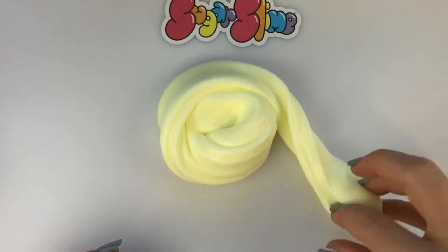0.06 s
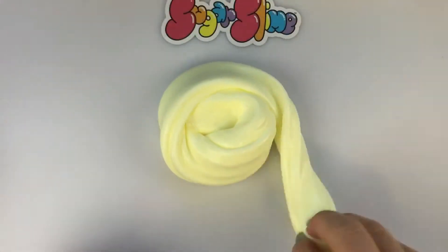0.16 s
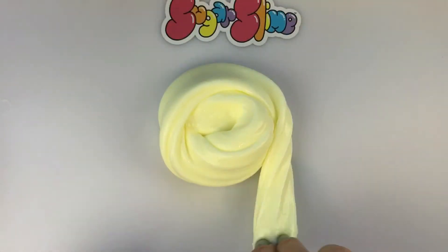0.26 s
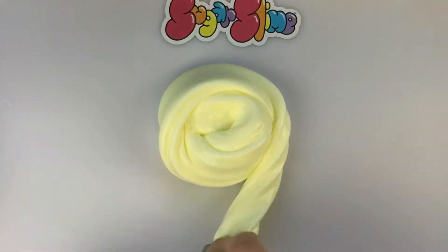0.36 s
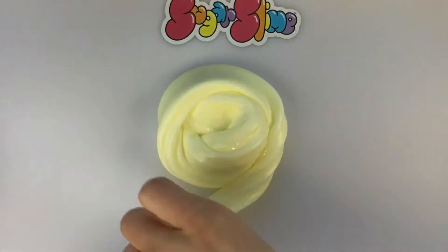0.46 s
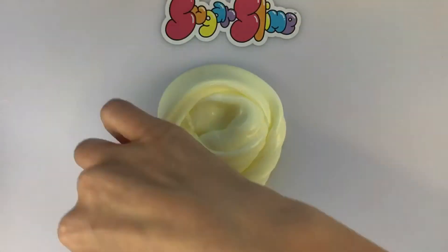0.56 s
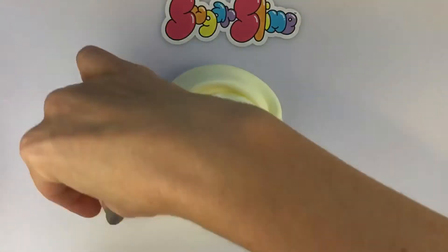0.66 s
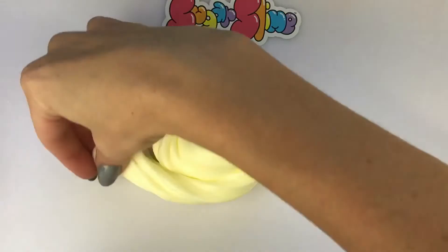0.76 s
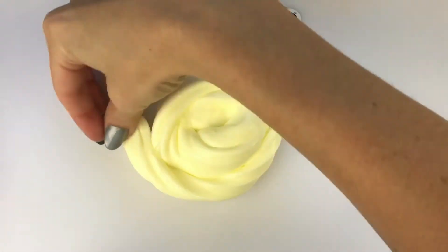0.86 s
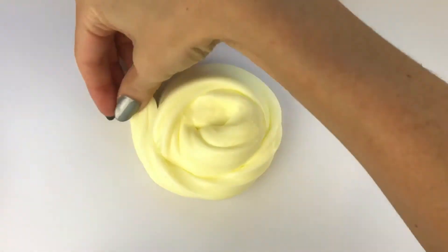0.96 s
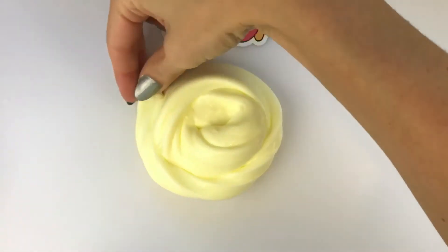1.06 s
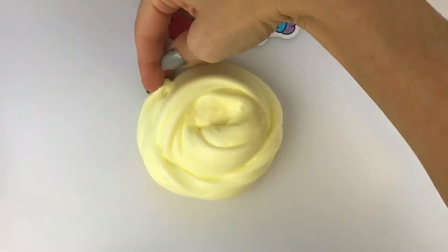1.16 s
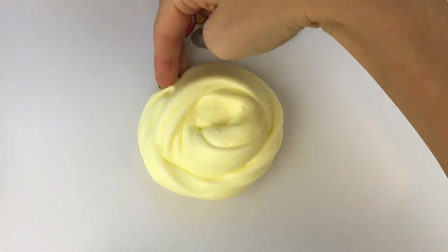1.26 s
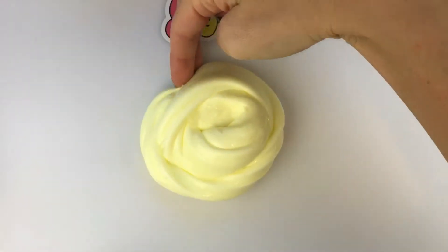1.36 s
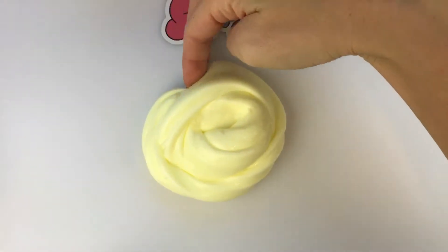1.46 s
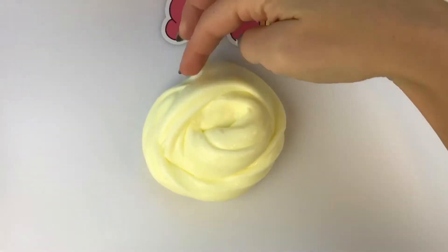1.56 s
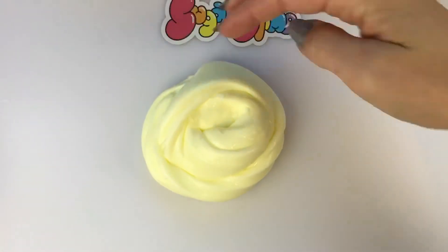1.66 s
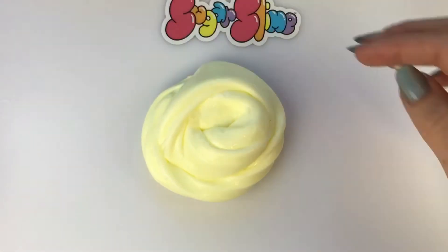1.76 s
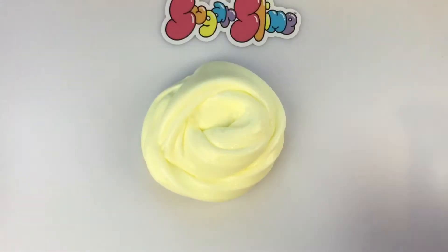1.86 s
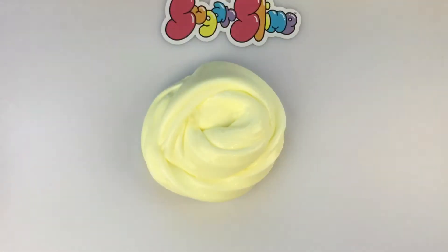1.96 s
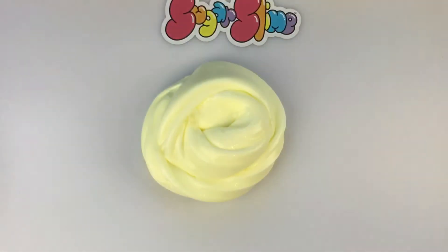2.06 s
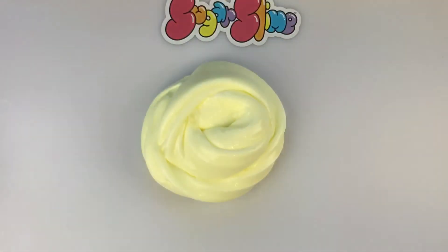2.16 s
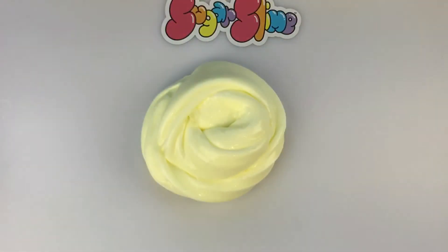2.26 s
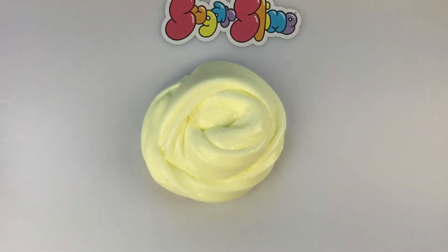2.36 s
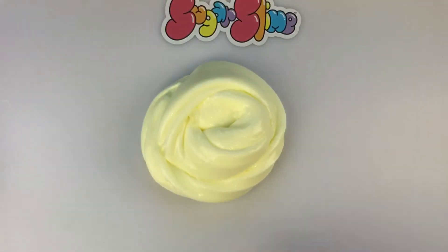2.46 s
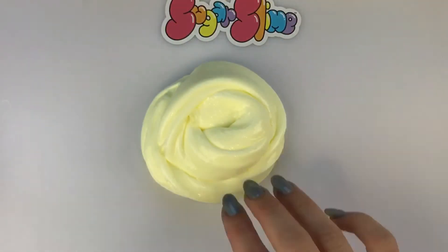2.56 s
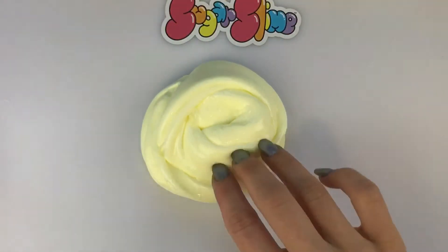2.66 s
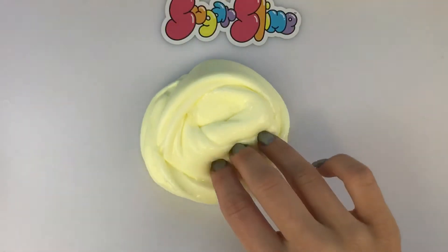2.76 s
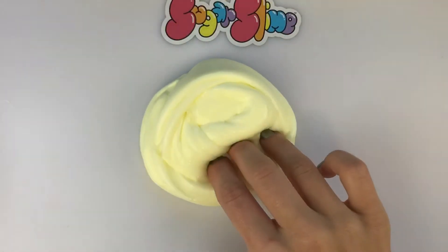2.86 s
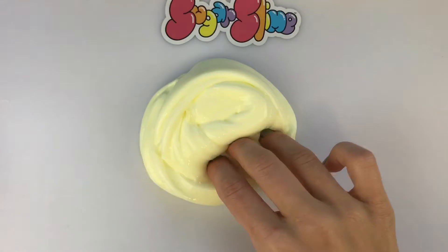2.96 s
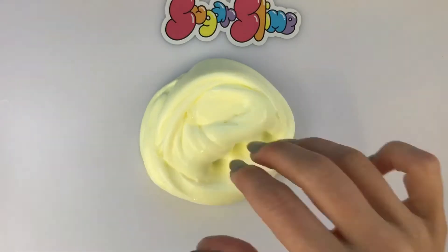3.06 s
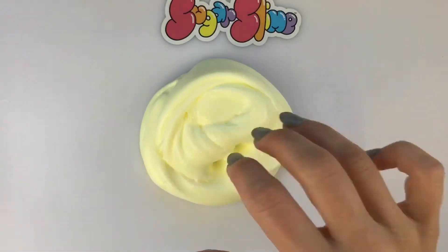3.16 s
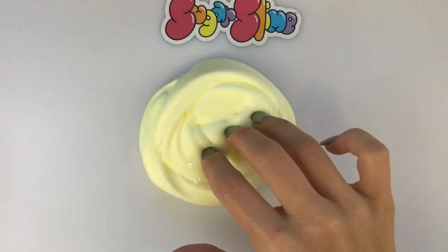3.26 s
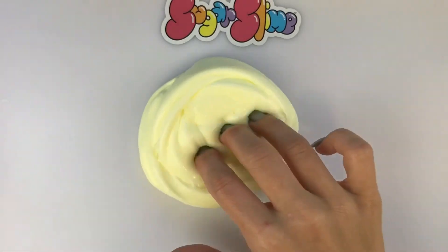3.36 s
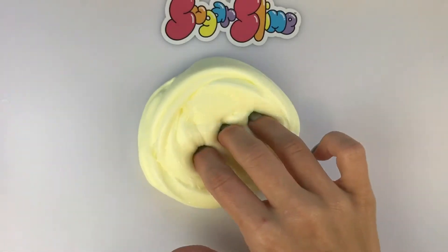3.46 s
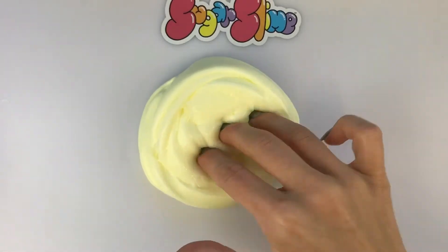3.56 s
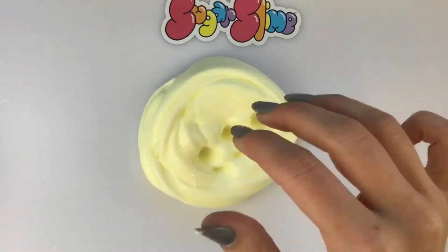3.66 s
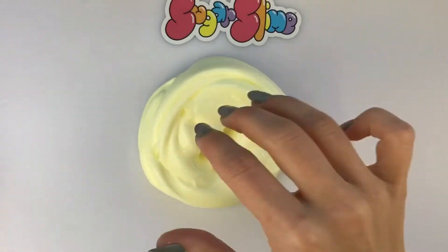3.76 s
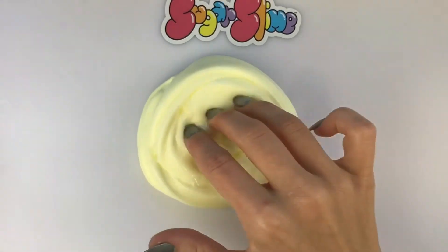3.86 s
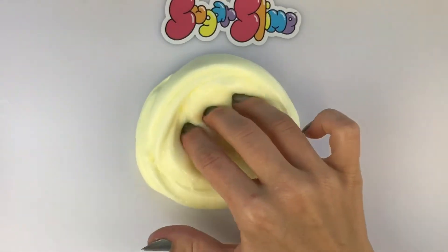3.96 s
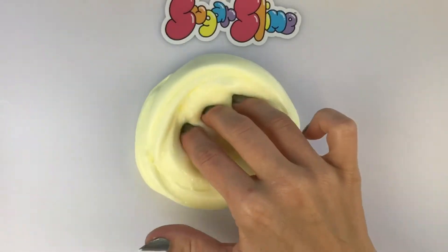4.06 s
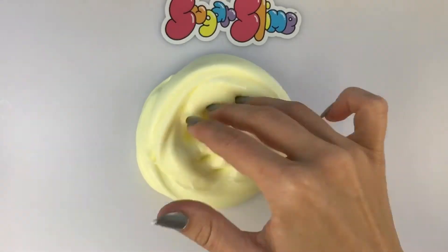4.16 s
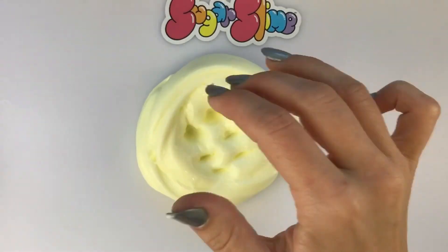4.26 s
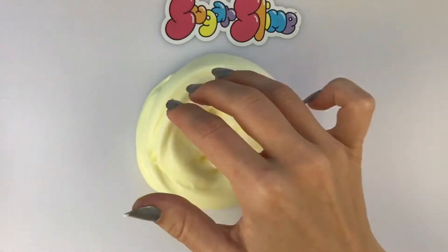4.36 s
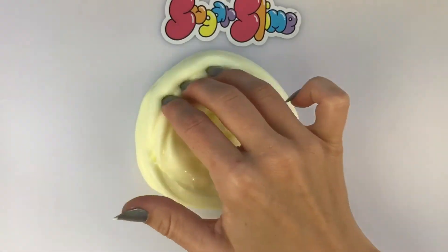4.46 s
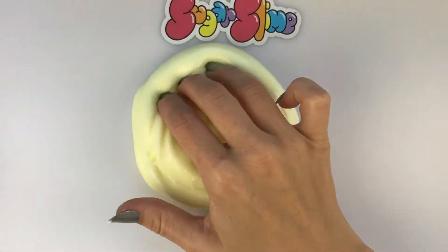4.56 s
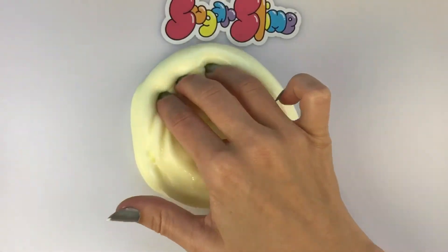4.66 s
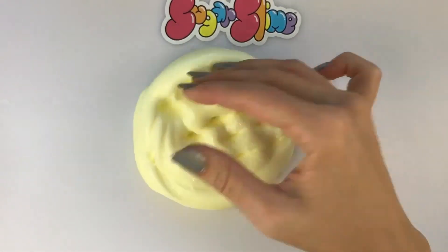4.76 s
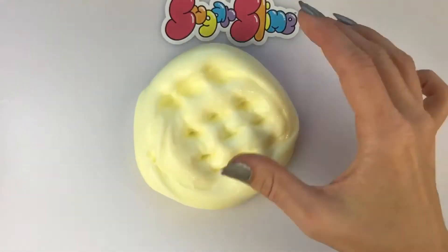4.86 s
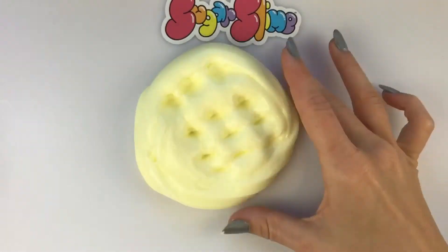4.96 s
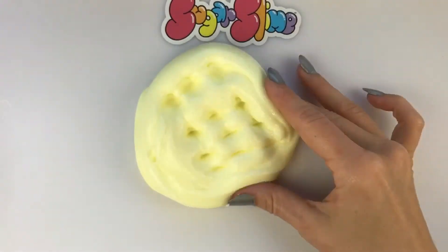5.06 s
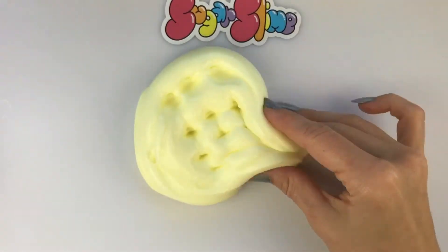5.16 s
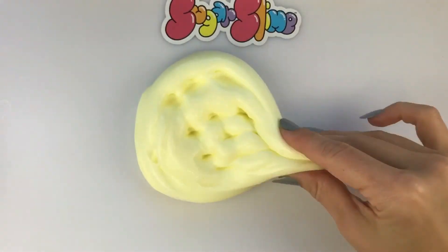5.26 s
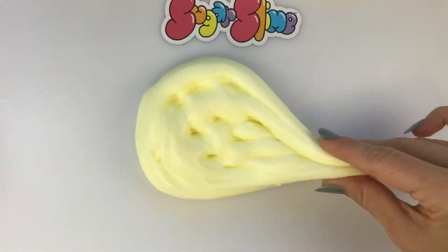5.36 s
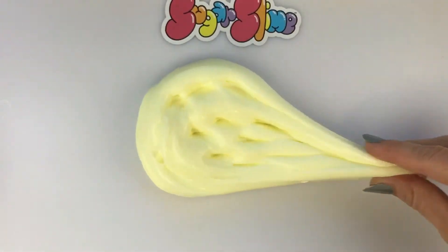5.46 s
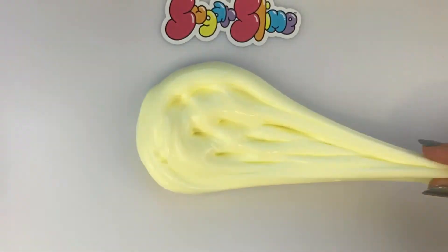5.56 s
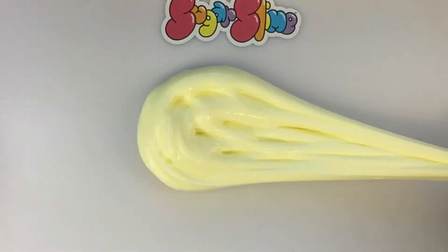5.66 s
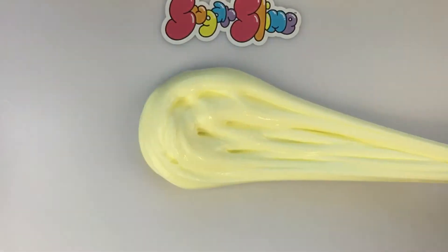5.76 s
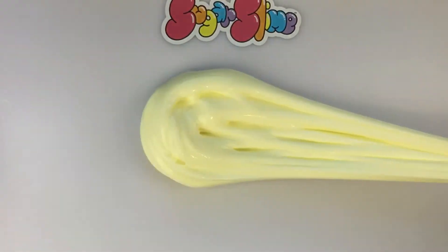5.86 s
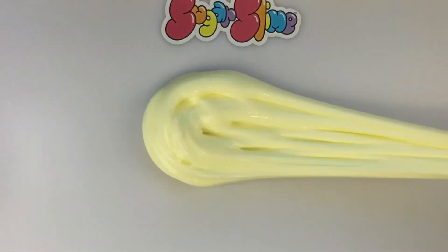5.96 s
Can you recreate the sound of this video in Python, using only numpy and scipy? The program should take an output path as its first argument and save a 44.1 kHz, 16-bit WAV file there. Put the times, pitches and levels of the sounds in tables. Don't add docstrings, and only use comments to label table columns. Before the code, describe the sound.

Close to a phone microphone in a quiet room, thick slime on a table is handled by fingers. Faint hush and light sticky ticks come first, with a few isolated clicks. Around three seconds, pokes begin, each giving a tight burst of sharp snaps, wet clicks, hollow gulps and small table thuds. The strongest bursts fall in the middle, then peeling crackle fades into a soft stretch.

```python
import sys
import numpy as np
from scipy import signal
from scipy.fft import rfft, irfft, next_fast_len
from scipy.io import wavfile
from scipy.ndimage import uniform_filter1d

SR = 44100
rng = np.random.default_rng(int(sys.argv[2]) if len(sys.argv) > 2 else 0)


def voltage_ratio(level):
    return 10 ** (np.asarray(level, float) / 20)


def wav_record(signal):
    frames = np.transpose(np.atleast_2d(signal))
    bounded = np.clip(frames, -1, 1)
    quanta = np.round(bounded * 32767).astype(np.int16)
    wavfile.write(sys.argv[1], SR, quanta)


N = 265041
REST_GAP_HZ = 5100


def along(points, hz):
    f, value = np.transpose(points)
    return np.interp(np.log(hz + 1), np.log(f + 1), value)


def unit(x):
    return x / np.sqrt(np.mean(x ** 2) + 1e-20)


def filtered(x, response):
    m = next_fast_len(N + 8192)
    return irfft(rfft(x, m) * response(np.fft.rfftfreq(m, 1 / SR)), m)[:N]


def laid(start_s, rows):
    at = np.round(start_s * SR).astype(int)[:, None] + np.arange(rows.shape[1])
    return np.bincount(np.clip(at, 0, N).ravel(), rows.ravel(), N + 1)[:N]


def swell(length_s, size, sharp):
    t = np.arange(size) / SR
    fall = length_s[:, None] / (1.4 + 1.4 * sharp)
    rise = sharp * fall
    return t, rise[:, 0], (t / rise) ** sharp * np.exp(sharp - t / fall)


def hush():
    # frequency in Hz, density in dB per Hz.
    hush_curve = [(15, -54), (25, -6.5), (47, 1), (108, 1), (232, -8), (368, -13), (457, -19.5),
                  (669, -16.5), (1510, -26), (2090, -27.5), (11600, -37.5), (15200, -32.5), (16500, -65)]
    # frequency in Hz, width in Hz, gain in dB.
    port_modes = [
        (6470, 710, 6.5),
        (11620, 450, 9.5),
    ]
    level_db, patchy_db = -63, 1.53
    z = signal.stft(rng.standard_normal(N), nperseg=512)[2]
    over_hz = uniform_filter1d(rng.standard_normal(z.shape), 8, 0)
    patches = uniform_filter1d(over_hz, 12, 1)
    noise = signal.istft(z * voltage_ratio(patchy_db * unit(patches)), nperseg=512)[1][:N]

    def colour(f):
        port = 1 + sum(voltage_ratio(db) / (1 + (2 * (f - hz) / w) ** 2) for hz, w, db in port_modes)
        return voltage_ratio(along(hush_curve, f)) * port

    return voltage_ratio(level_db) * unit(filtered(noise, colour))


def effort():
    # start in seconds, end in seconds, effort at the start in dB,
    # effort at the end in dB, gap pitch in Hz.
    stroke_list = [(0.203, 0.4, -80, -76.5, 4700), (0.588, 0.656, -71, -62.5, 2620),
                   (.8, .97, -82, -81, 4340), (.97, 1.116, -72.5, -81, 4260),
                   (1.413, 1.697, -76, -84, 5950), (3.117, 3.25, -74, -84, 4700),
                   (3.693, 3.744, -64, -64.5, 3450), (3.74, 4.044, -72, -70.5, 4250),
                   (4.252, 4.44, -69.5, -83.5, 4400), (4.612, 4.703, -72, -88, 5530),
                   (4.814, 4.932, -55, -77, 3900), (4.97, 5.06, -76, -77, 4100),
                   (5.057, 5.138, -73.5, -68.5, 6500), (5.129, 5.175, -66.5, -56, 5930),
                   (5.173, 5.204, -58, -61, 6500), (5.204, 5.229, -59.5, -64, 8000),
                   (5.228, 5.259, -64, -64, 5730), (5.263, 5.292, -59, -67, 3800),
                   (5.292, 5.334, -64, -63, 3700), (5.334, 5.38, -69, -61.5, 3400),
                   (5.376, 5.46, -75, -83, 4500), (5.46, 5.957, -80.5, -77.5, 5330),
                   (4.174, 4.195, -72, -70, 5900), (4.763, 4.78, -72, -69, 6000)]
    rest_db = -82.5
    t = np.arange(N) / SR
    over_db = np.zeros(N)
    gap_hz = np.full(N, float(REST_GAP_HZ))
    for start, end, first_db, last_db, hz in stroke_list:
        on = slice(round(start * SR), round(end * SR))
        over_db[on] = np.interp(t[on], [start, end], [first_db, last_db]) - rest_db
        gap_hz[on] = hz
    return uniform_filter1d(over_db, size=200), gap_hz


def peeling():
    # pitch in Hz, spread in octaves, rate in grains per second, length in cycles.
    grain_sizes = [
        (1142, 1.42, 2600, 2),
        (3900, 1.17, 4800, 1.57),
        (10000, 0.69, 5400, 0.98),
    ]
    # resting level in dB, gain in dB per dB of effort,
    # tilt in dB per octave of gap pitch.
    follow_rules = [
        (-81, 0.7378, 2),
        (-83.5, 0.9855, -0.3),
        (-86.5, 1.0556, 7.5),
    ]
    spiky_db = 1.8
    over_db, gap_hz = effort()
    gap_octaves = np.log2(gap_hz / REST_GAP_HZ)
    bunching = unit(uniform_filter1d(rng.standard_normal(N), 350))
    clumps = voltage_ratio(2.8 * np.clip(bunching, -2, 2))
    out = np.zeros(N)
    for k, (hz, octaves, rate, cycles) in enumerate(grain_sizes):
        count = int(min(rate * N / SR, 60000))
        when, pitch, luck = rng.random((3, count))
        when = when * N / SR
        centre = gap_hz[(when * SR).astype(int)] if k == 1 else hz
        f = centre * 2 ** (octaves * (2 * pitch - 1) ** 3)
        f = np.minimum(f, .36 * SR)[:, None]
        turns = np.arange(int(3 * cycles * SR / hz))[None] / SR * f
        rows = np.sin(2 * np.pi * turns) * turns * np.exp(-2.5 * turns / cycles)
        rows *= voltage_ratio(-spiky_db * np.log(luck[:, None] + 1e-3))
        grains = unit(laid(when, rows * np.sqrt(f / hz)) * np.roll(clumps, k * SR))
        rest_db, grows, tilt_db = follow_rules[k]
        out += voltage_ratio(rest_db + grows * over_db + tilt_db * gap_octaves) * grains
    return out


def pops(table, size, sharp, glide, rough, gain_db, splash_db):
    s, db, hz, ms = np.transpose(table)
    t, peak, shape = swell(ms / 1000, size, sharp)
    turns = hz[:, None] * t * (1 + glide * (t / (ms[:, None] / 1000) - 1) / 4)
    noise = rng.standard_normal(shape.shape)
    walls = uniform_filter1d(noise, size // 40, axis=1)
    tone = np.sin(2 * np.pi * turns + rough * walls / walls.std())
    wet = uniform_filter1d(noise[::-1], size // 90 + 1, axis=1)
    splash_shape = np.sin(np.pi * (t / t[-1]) ** 0.27) ** 2
    splash = voltage_ratio(splash_db) * wet / wet.std() * np.sin(2 * np.pi * turns) * splash_shape
    level = voltage_ratio(db + gain_db)[:, None]
    return laid(s - peak, level * shape * tone) + laid(s - peak - t[-1] / 8, level * splash)


def clicks(small):
    # time in seconds, peak in dB, pitch in Hz, length in ms.
    click_list = [(0.205, -57, 4630, 0.65), (0.5903, -59, 2580, 1.35), (0.7215, -50, 3150, 0.8),
                  (0.7229, -47.5, 4530, 0.36), (1.4918, -51.5, 6300, 1.05), (2.3213, -51, 4330, 1.2),
                  (2.4934, -50, 3900, 1), (3.0685, -36.5, 4640, 0.5), (3.0777, -42, 4700, 0.9),
                  (3.0893, -38.5, 5700, 1.5), (3.0925, -46, 4850, 0.85), (3.6462, -36, 4020, 2.3),
                  (3.6586, -24, 3605, 1.22), (3.6625, -30, 3830, 1.2), (3.9201, -52.5, 2870, 1.5),
                  (4.167, -51.5, 5700, 2), (4.197, -43, 2760, 1.3), (4.2083, -33.5, 4380, 1.6),
                  (4.2163, -23.5, 3930, 0.76), (4.2208, -23, 3900, 0.88), (4.2315, -36, 4080, 0.68),
                  (4.591, -40.5, 4020, 0.83), (4.564, -59, 2880, 0.8), (4.7824, -34, 5920, 0.6),
                  (4.7866, -32, 3340, 1.57), (4.7897, -36, 2580, 1.2), (4.7919, -32, 5170, 0.49),
                  (4.9405, -46, 3140, 0.56), (5.156, -42.5, 6200, 0.56), (5.2645, -54, 4810, 0.71)]
    return pops(click_list + small, size=500, sharp=.7, glide=0.049, rough=0.34, gain_db=5.0, splash_db=-19.5)


def gulps(large):
    # time in seconds, peak in dB, pitch in Hz, length in ms.
    gulp_list = [(0.5906, -58, 1340, 3.4), (0.6208, -44, 1450, 0.41), (0.638, -54, 1410, 4),
                 (0.7215, -49, 2040, 1.8), (2.4942, -50, 1200, 1.1), (2.9016, -48.5, 1040, 2.6),
                 (3.0613, -42, 1020, 2.1), (3.0767, -47, 1320, 4.1), (3.0931, -38, 930, 1.7),
                 (3.4355, -48, 1120, 1.8), (3.4694, -52.5, 1070, 3), (3.637, -43, 1330, 2.1),
                 (3.6431, -37, 644, 1.9), (3.6505, -38, 638, 1.5), (3.6606, -31, 1190, 3.24),
                 (3.6672, -38, 890, 3.1), (4.0138, -49, 970, 1.6), (4.1995, -44, 1060, 0.82),
                 (4.2095, -45, 1490, 1.9), (4.2182, -31, 936, 2.23), (4.2217, -37, 1020, 1.4),
                 (4.2355, -42, 950, 2.1), (4.5828, -45.5, 1100, 1.8), (4.7867, -30, 1250, 0.97),
                 (4.7922, -22.5, 1040, 4.3), (4.7992, -29.5, 950, 3.46), (4.8035, -27, 797, 2.14),
                 (4.8129, -41, 865, 1.8), (4.9392, -19.5, 800, 1.8), (4.948, -36.5, 800, 3.04),
                 (0.631, -57, 1940, 4.2), (.643, -59, 1940, 6.2), (3.085, -51, 1900, 1.5),
                   (3.635, -43, 2070, 1.2), (3.6383, -46, 1700, 2.4), (3.642, -24, 9180, 0.8),
                   (3.6452, -32, 13700, 1.3), (.205, -59, 2600, 0.7), (2.3197, -53, 3250, 0.72),
                   (3.6598, -27, 2410, 1.06), (3.665, -39.5, 592, 4.5), (4.7858, -28.5, 1105, 1.9),
                   (4.7884, -28.5, 1730, 4.65), (4.803, -38, 1990, 1.9), (4.812, -46, 1770, 5),
                   (4.9388, -39.5, 2320, 1.23), (4.9416, -35, 597, 3.7), (5.029, -53, 118, 28)]
    return pops(gulp_list + large, size=1400, sharp=.8, glide=-0.092, rough=0.28,
                gain_db=1.34, splash_db=-29.0)


def gritty_hiss(table, colour, grit_share):
    t = np.arange(N) / SR
    stroke = sum(voltage_ratio(db) * np.exp(-(2 * (t - s) / ms * 1000) ** 6) for s, db, ms in table)
    lumps = np.abs(unit(uniform_filter1d(rng.standard_normal(N), 60)))
    grit = rng.standard_normal(N) * (1 + grit_share * lumps ** 2)
    return stroke * unit(filtered(grit, colour))


def skin(f):
    return f / (f + 300) / (1 + (f / 13000) ** 2)


def rubs():
    # middle in seconds, level in dB, length in ms.
    rub_list = [(0.265, -76, 20), (5.612, -71, 15), (5.66, -68.5, 17), (5.32, -63, 14), (0.42, -68, 17),
                (1.2, -69, 33), (1.23, -67.5, 38), (1.437, -64.5, 35), (1.614, -66.5, 39), (2.05, -69, 73),
                (3.85, -66.5, 360), (0.904, -73.5, 250), (0.42, -69, 3), (2.1, -57, 5.1), (2.7, -64.5, 1.9)]
    return gritty_hiss(rub_list, skin, grit_share=0.21)


def snaps():
    # time in seconds, peak in dB, centre in Hz, length in ms.
    snap_list = [(0.6545, -54.5, 7760, 2.5), (0.7216, -41.5, 11100, 2.75), (1.1064, -55, 12400, 1.2),
                 (1.1937, -53, 12100, 0.6), (2.1766, -63, 11950, 0.39), (2.319, -64, 12320, 1.5),
                 (2.4929, -55.5, 11800, 3.1), (3.0678, -46, 11900, 1.3), (3.083, -42, 9260, 1.4),
                 (3.089, -42.5, 9500, 1.9), (3.1018, -47, 8700, 1.4), (3.6426, -22.5, 13500, 1.2),
                 (3.6589, -29, 14300, 0.65), (3.9195, -50.5, 15460, 1.1), (4.2009, -44, 11800, 0.9),
                 (4.2161, -27, 11000, 0.55), (4.2207, -36, 7200, 0.46), (4.2312, -33, 7840, 0.23),
                 (4.5786, -49, 12380, 0.43), (4.5915, -31.5, 9650, 1.05), (4.7832, -29, 8400, 0.57),
                 (4.786, -31.5, 13000, 1.7), (4.788, -28, 9700, 1.15), (4.791, -31, 10200, 0.53),
                 (4.8114, -37, 14450, 0.53), (4.9374, -46, 11100, 1.1), (5.155, -49, 8600, 6.1),
                 (5.206, -51, 11280, 0.79), (5.211, -48, 8460, 3.7), (5.2535, -50, 9600, 2.8)]
    ring_share, spray_db, spray_t60 = 0.78, -18.5, 0.036
    s, db, hz, ms = np.transpose(snap_list)
    t, peak, shape = swell(ms / 1000, size=900, sharp=.45)
    noise = rng.standard_normal(shape.shape)
    crack = shape * (ring_share * np.sin(2 * np.pi * hz[:, None] * t) + 1.18 * noise)
    crack /= np.abs(crack).max(axis=1, keepdims=True)
    spray = voltage_ratio(spray_db - 60 * t / spray_t60) * noise[::-1]
    x = laid(s - peak, voltage_ratio(db + 10.5)[:, None] * (crack + spray))

    def small_source(f):
        return (1j * f / 6000 / (1 + 1j * f / 6000)) ** 2 / (1 + 1j * f / 12000)

    return filtered(x, small_source)


def bursts():
    # time in seconds, peak in dB, pitch in
    # Hz, width in cycles.
    burst_list = [(.6385, -48, 6000, .7), (.6795, -60, 12000, .6), (.7209, -37, 7500, 0.67),
                  (.7229, -42, 6000, .55), (.757, -54, 2500, .8), (2.3190, -36.5, 4260, 1.3),
                  (2.381, -58, 12500, .6), (2.493, -40, 9000, 0.49), (3.0602, -52, 5000, .6),
                  (3.0675, -44, 7000, 1.5), (3.0755, -26.5, 4870, 1.7), (3.0827, -33, 6500, 0.54),
                  (3.0915, -31, 5000, .7), (3.423, -49, 3000, 0.89), (3.435, -54, 2800, 1),
                  (3.6402, -39, 12000, 1.5), (3.6416, -12.5, 11700, 0.82), (3.6435, -33, 8000, 1.5),
                  (3.6585, -14, 12500, 0.88), (3.6693, -38, 5500, .7), (3.6722, -38, 4200, 1.5),
                  (4.2157, -22, 10000, 0.76), (4.2206, -25, 8000, .6), (4.2184, -31, 4200, 0.79),
                  (4.2183, -26, 4000, 1.4), (4.228, -36, 7500, .7), (4.2342, -41, 5500, .9),
                  (4.5789, -44, 6000, .6), (4.591, -22.5, 8000, 0.58), (4.7684, -41, 3500, 0.35),
                  (4.7817, -20.5, 6500, 0.81), (4.7846, -22, 4000, 0.76), (4.7855, -27, 4500, 0.67),
                  (4.7855, -23, 9000, 0.56), (4.7897, -23, 6000, .6), (4.8022, -32, 6000, .8),
                  (4.808, -32, 8500, 0.65), (4.9383, -28.5, 2920, 0.61), (4.9386, -33, 2370, 1),
                  (5.1425, -52, 6000, .8), (5.1725, -44, 7500, .9), (5.184, -48, 6500, 1.2),
                  (5.191, -49, 9000, .8), (5.279, -48, 3800, .9), (5.272, -45, 4000, .9),
                  (5.32, -50, 14000, 1.0), (5.371, -43, 3200, 0.86), (5.376, -43, 6000, .7),
                  (.5925, -56, 900, 0.79), (.6005, -56, 1500, .8), (.6205, -50, 1300, 0.86),
                 (.6495, -54, 1500, 1.1), (2.4955, -51, 2000, .8), (3.6715, -40, 596, 1.3),
                 (3.922, -51, 1000, 1.1), (4.2195, -38, 566, 1.4), (4.226, -48.5, 560, 1.5),
                 (4.572, -52, 1100, 1.2), (4.7695, -51, 1900, 1.2), (4.797, -38, 564, 1.3),
                 (4.955, -41, 650, 1.3)]
    lean = 0.44
    s, db, hz, cycles = np.transpose(burst_list)[..., None]
    t = np.arange(-150, 150) / SR
    rows = np.cos(2 * np.pi * hz * t + lean) * np.exp(-(hz * t / cycles) ** 2 * 2)
    return laid(s[:, 0] + t[0], voltage_ratio(db) * rows)


def strings():
    # start in seconds, length in ms, first peak in dB, pitch in Hz.
    string_list = [(.95, 82, -65, 3550), (5.285, 96, -59, 3300), (5.3, 65, -59.5, 3350),
                   (5.285, 90, -57, 1200), (8.3, 15, -59, 3500), (4.8, 25, -48, 2310),
                   (4.25, 97, -63.5, 3100), (.621, 32, -53, 1390), (.625, 33, -57.5, 2550),
                   (1.4255, 30, -56, 6300), (3.08, 8, -43, 4200), (3.1, 3.4, -51.5, 3900),
                   (3.667, 8, -53, 3300), (4.223, 11, -42, 3900), (4.8, 3.3, -49, 3400),
                   (4.84, 27, -49, 1060), (4.965, 87, -53, 770), (5.183, 28, -68, 3900),
                   (5.155, 77, -51, 1050), (5.266, 15, -52, 1200), (5.266, 14, -53, 3860)]
    count, small_hz = 7, 2300
    fade_db, scatter_db, pitch_spread, ring_cycles = -3, 2.2, 0.056, 4.5
    s, ms, db, hz = np.transpose(string_list)[..., None]
    late, size, pitch, life = np.moveaxis(rng.standard_normal((len(string_list), count, 4)), 2, 0)
    place = np.clip((np.arange(count) + .3 * late) / (count - 1), 0, 1)
    f = hz * np.exp(pitch_spread * pitch)
    cycles = ring_cycles * (hz / 3000) ** .6 * np.exp(.3 * life)
    peak_db = db + fade_db * place + scatter_db * size
    rows = np.array([s + place * ms / 1000, peak_db, f, 1000 * cycles / f])
    rows = rows.reshape(4, -1).T
    large = np.repeat(hz.ravel() < small_hz, count)
    return rows[large].tolist(), rows[~large].tolist()


def hollow(f):
    # frequency in Hz, width in Hz, gain in dB.
    cavity_modes = [
        (1250, 820, 2),
        (3950, 940, -2),
        (6200, 1900, -6.5),
    ]
    return 0.12 * skin(f) + sum(voltage_ratio(db) / (1 + (2 * (f - hz) / w) ** 2) for hz, w, db in cavity_modes)


def squish():
    # middle in seconds, level in dB, length in ms.
    squish_list = [(.639, -61.5, 45), (4.58, -67, 17), (3.083, -55, 47), (3.638, -51, 11.7),
                   (3.668, -46.5, 22), (4.2185, -45.5, 42), (5.32, -66, 220)]
    return gritty_hiss(squish_list, hollow, grit_share=0.57)


def thuds():
    # time in seconds, peak in dB, pitch in Hz, length in ms.
    thud_list = [(3.0729, -46.5, 220, 10.6), (3.0892, -40.5, 235, 11.9), (3.1063, -39.5, 214, 6.3),
                 (3.6523, -38, 227, 17), (3.6747, -41, 254, 9.1), (3.6894, -40.5, 249, 12),
                 (4.2248, -44.5, 321.6, 23.6), (4.2415, -38.5, 256, 4.8), (4.7863, -60, 230, 9.7),
                 (4.8018, -51, 265, 3.8), (4.941, -39.5, 324, 7.6), (4.98, -46, 258, 4.4)]
    return pops(thud_list, size=3000, sharp=0.98, glide=-0.02, rough=0.28, gain_db=0.0, splash_db=-16.5)


def table_hum():
    t = np.arange(N) / SR
    ring = filtered(rng.standard_normal(N), lambda f: 1 / (1 + ((f - 350) / 12) ** 2))
    return voltage_ratio(-75.5) * np.exp(-((t - 5.4) / 0.56) ** 4) * unit(ring)


def room(x, wet_db):
    # frequency in Hz, time to fall by 60 dB in seconds.
    decay_curve = [(150, 0.5), (900, 0.22), (3000, 0.097), (8000, 0.12), (16000, 0.14)]
    # delay in ms, level in dB.
    echo_list = [(.6, -72), (1.3, -17.5), (2.2, -23)]
    out = x.copy()
    for ms, db in echo_list:
        out += voltage_ratio(db) * np.roll(x, round(ms * SR / 1000))
    step = SR // 5
    for start in range(0, N, step):
        hz, t, z = signal.stft(rng.standard_normal(SR // 2), SR, nperseg=128)
        decay = voltage_ratio(-60 * t / along(decay_curve, hz)[:, None])
        tail = signal.istft(z * decay, SR, nperseg=128)[1]
        wet = signal.fftconvolve(x[start:start + step], tail / np.linalg.norm(tail))
        out[start + 130:][:len(wet)] += voltage_ratio(wet_db) * wet[:max(N - start - 130, 0)]
    return out


def scene():
    large, small = strings()
    films = snaps() + bursts()
    low = room(gulps(large) + thuds(), wet_db=-13.0)
    high = room(clicks(small) + 0.62 * films, wet_db=-12.5)
    near = low + high + 0.38 * films
    soft = hush() + peeling() + rubs() + squish() + table_hum()
    soft = filtered(soft, lambda f: np.interp(f, [15750, 15950], [1.2, .15]))
    return (near + soft)[None]


def band_limit(x):
    return signal.sosfilt(signal.butter(12, 17050, fs=SR, output="sos"), x)


def record(dry):
    heard = filtered(dry[0], lambda f: np.interp(f, [15500, 16100, 16900, 17050], [1, .3, .18, 0]))
    return band_limit(heard[None])


dry = scene()
out = record(dry)
wav_record(out)
```